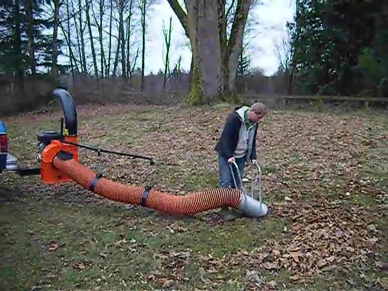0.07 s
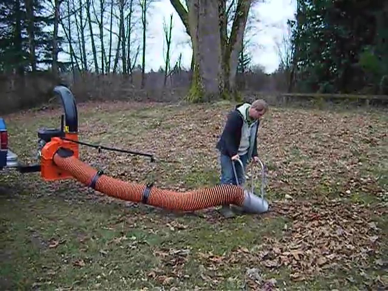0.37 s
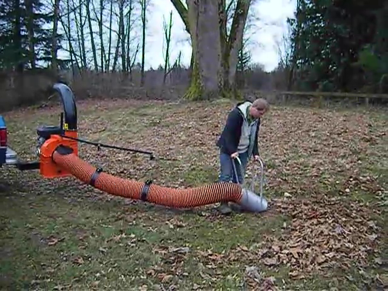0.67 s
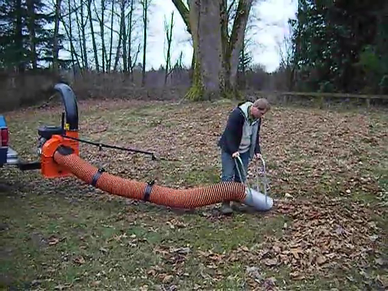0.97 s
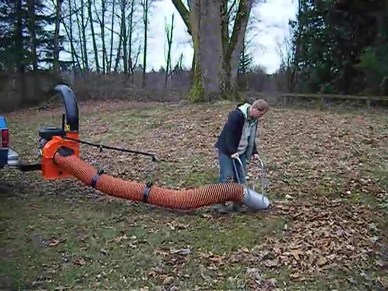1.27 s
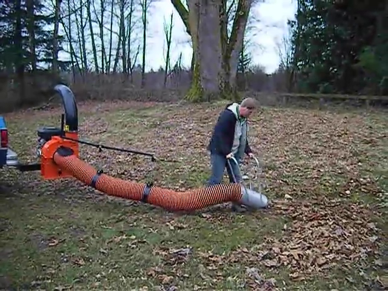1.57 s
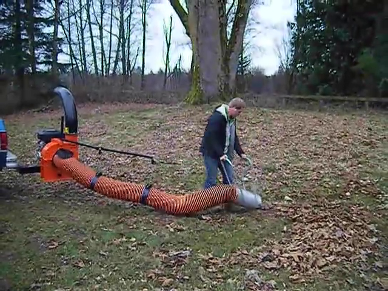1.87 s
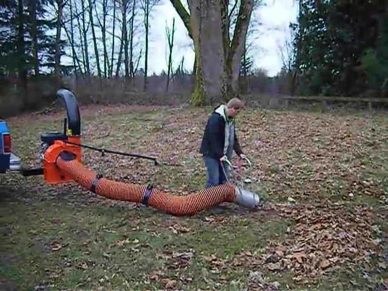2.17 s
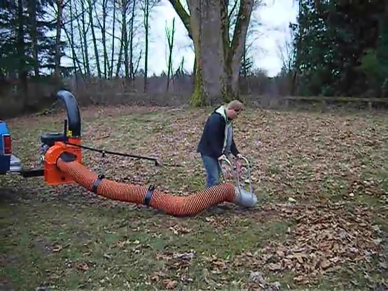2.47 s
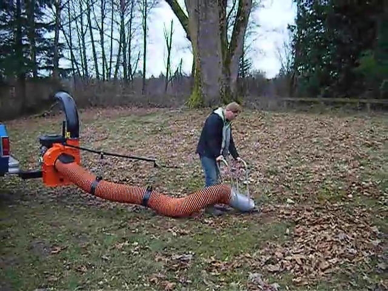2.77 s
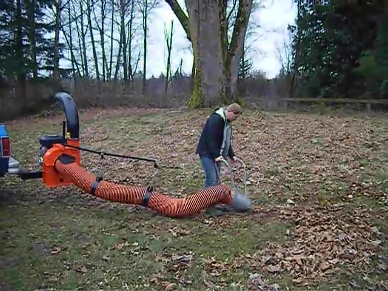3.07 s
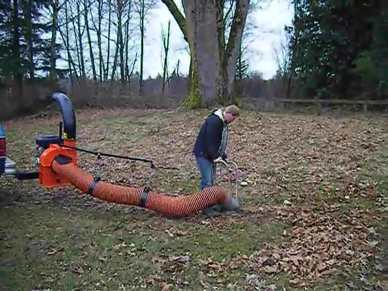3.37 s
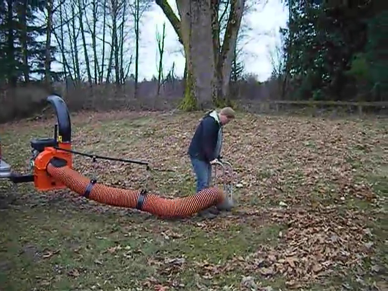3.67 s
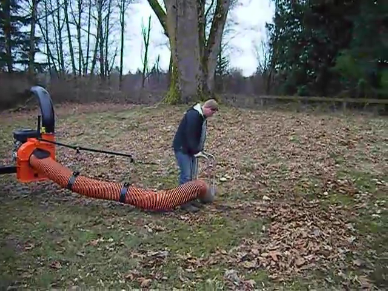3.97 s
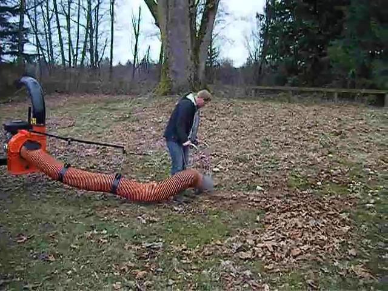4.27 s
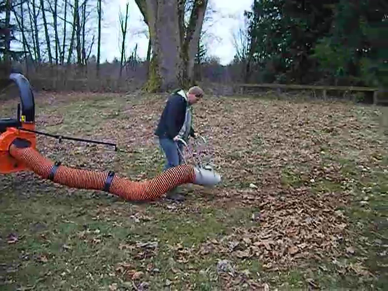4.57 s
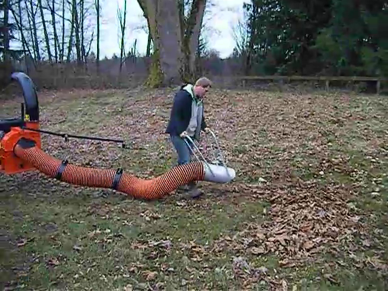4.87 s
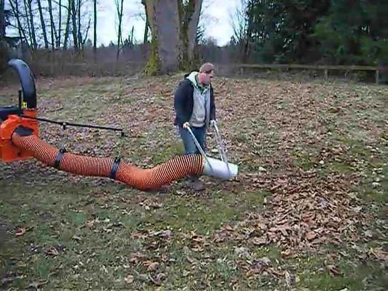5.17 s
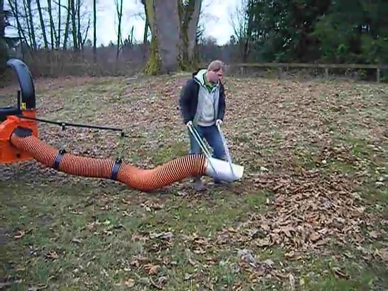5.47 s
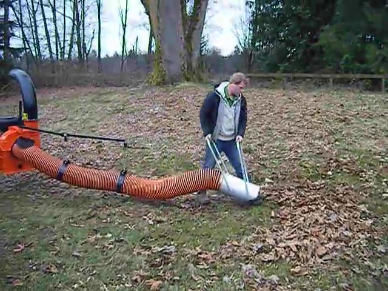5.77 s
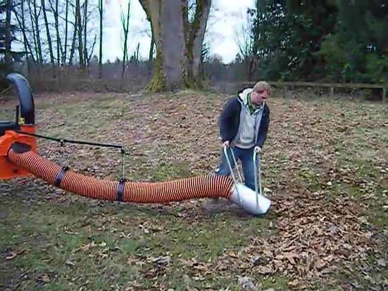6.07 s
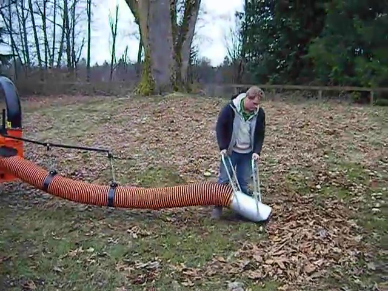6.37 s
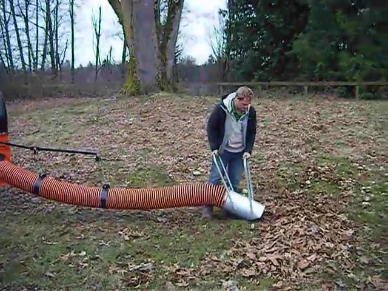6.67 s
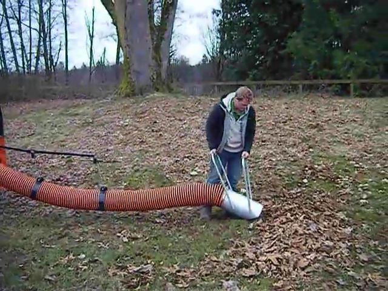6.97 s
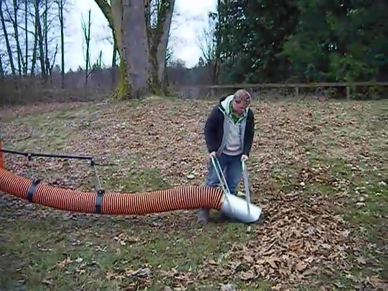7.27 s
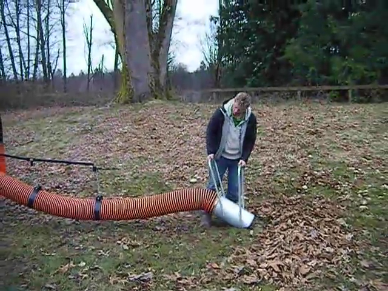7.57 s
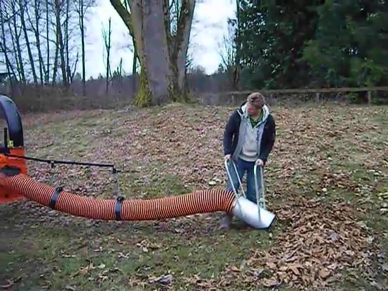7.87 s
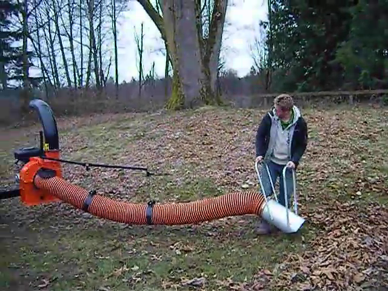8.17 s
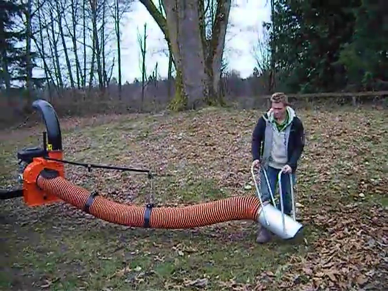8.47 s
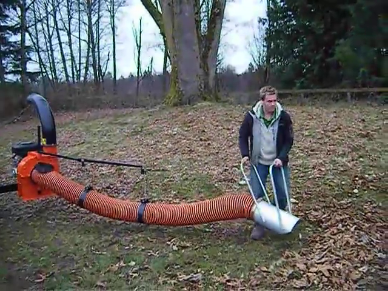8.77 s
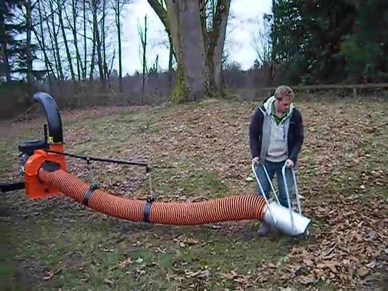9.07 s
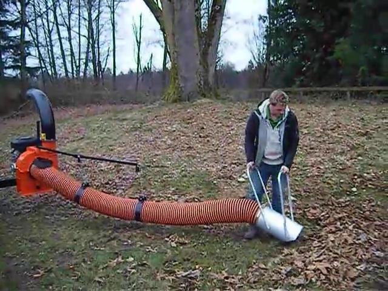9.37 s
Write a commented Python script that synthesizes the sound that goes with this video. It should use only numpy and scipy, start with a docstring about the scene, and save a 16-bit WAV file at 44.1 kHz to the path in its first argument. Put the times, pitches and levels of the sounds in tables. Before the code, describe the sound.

A loud engine and blower hum runs without a break outdoors as a leaf vacuum clears a lawn. Leaves hiss through the hollow hose in swells, with occasional twig snaps. About three quarters through, hard bits clatter and ring in the metal housing, and the drone dips for a moment. The microphone, dull in the treble, moves about and faces the machine at the end, so the air roar swells.

```python
"""On a lawn, a moving microphone hears a petrol debris loader running flat out: a V-twin engine spins
a four-bladed impeller that drones and roars. Gulps of leaves rustle up the hose in the first second
and again around 4 s, with twigs ticking among them. Just after 7 s a few hard pieces clang through
the steel housing and make the recorder's gain control duck. In the last second the microphone turns
back to the machine and the rush of air grows."""
import sys
import numpy as np
from scipy import signal
from scipy.fft import rfft, irfft, next_fast_len
from scipy.io import wavfile

SR = 44100
rng = np.random.default_rng(int(sys.argv[2]) if len(sys.argv) > 2 else 0)


def int16_out(signal):
    """Quantize to a 16-bit WAV file."""
    q = np.round(np.clip(np.atleast_2d(signal).T, -1, 1) * 32767)
    wavfile.write(sys.argv[1], SR, q.astype(np.int16))


N = 415422
TIME = np.arange(N) / SR
CUTOFF_HZ = 16000

# Levels in the tables are relative; each layer adds its own gain.
# rush of air at the microphone: time_s, level_db
AIR_LEVEL = [(0, -30.5), (2.6, -31.5), (5, -31), (8.2, -29), (9.1, -23), (9.42, -22)]
# engine note, in multiples of the four-stroke cycle: order, level_db
ENGINE_ORDERS = [(2, -18), (3, -20), (4, -17.5), (5, -8.5), (6, -17), (7, -16.5), (10, -20.5), (11, -17.5),
                 (22, -17.5)]
# turbulence in housing and chute: frequency_hz, density_db
ROAR_SPECTRUM = [(35, -26), (75, -23.5), (125, -2.5), (190, -8.5), (270, -4), (350, 0.5), (410, -6.5),
                 (510, 4), (660, -5.5), (780, -2), (1030, -11), (1330, -8.5), (2300, -12.5), (5500, -23)]
# gulps of leaves: fullest_s, length_s, rustle_db, roar_db, choke_db
LEAF_GULPS = [(0.207, 0.4, 1, 1, 0.8), (0.5, 0.27, 1.6, -0.5, -0.3), (0.73, 0.059, 3, 0.5, 1),
              (0.92, 0.1, 5, 1, 0.8), (3.577, 0.24, 4.5, -0.5, 4.5), (3.924, 0.19, 4.3, 0.8, 2.5),
              (4.26, 0.22, 4.5, 3, 2.5), (4.48, 0.18, 0.5, 1.5, -0.5), (5.648, 0.34, 1, 2.5, 0),
              (7.043, 0.27, 5, 1.5, 4.5), (7.508, 0.37, 3, -0.5, 2)]
# leaves sliding through: frequency_hz, density_db
RUSTLE_SPECTRUM = [(700, -17.5), (1300, 4.5), (1550, -5.5), (1850, 0.5), (2400, 0), (3600, -2), (5000, 1.5),
                   (5500, 0), (6000, -15.5)]
# hollow resonances of the duct: pitch_hz, width_hz, level_db
DUCT_MODES = [(1270, 60, -3), (1380, 60, 0), (1830, 120, -7), (2865, 55, 1), (3320, 25, -6), (3560, 22, 6),
              (3607, 18, 0), (4130, 30, -5)]
# twigs in the hose: start_s, level_db
TWIG_SNAPS = [(0.701, -17), (3.732, -13.5), (3.827, -14), (4.028, -17), (4.8513, -14.5), (7.053, -13),
              (8.6582, -26), (9.267, -16)]
# clatter of fragments: frequency_hz, density_db
CLATTER_SPECTRUM = [(400, -21), (1000, -9.5), (1500, -4), (1900, -4), (2400, -5), (3000, -1.5),
                    (4000, -0.5), (5000, 0), (6000, -4.5)]
# hard pieces hitting the housing: start_s, level_db, clatter_t60_s, ring_db, favoured_hz
HARD_HITS = [(7.113, -10, 0.094, -26, 4800), (7.117, -7.5, 0.1, 3.5, 3640), (7.137, -2, 0.25, 4.5, 1970),
             (7.149, 1.5, 0.19, -15, 3830), (7.164, -4, 0.096, 7.5, 4010),
             (7.251, -10.5, 0.24, -25.5, 4000), (7.367, -13, 0.17, -2, 2240), (7.374, -7, 0.28, -8.5, 4625),
             (7.396, -10.5, 0.27, 3.5, 2480), (7.724, -20, 0.49, -26, 4730), (7.750, 1, .035, 2.5, 2190),
             (7.757, 2.5, 0.024, -16, 4800)]
# modes of the steel housing: pitch_hz, level_db, t60_s
HOUSING_MODES = [(1486, -10, .6), (1697, -8, .6), (1873, -.5, .5), (1925, -4, .5), (1981, -1, .5),
                 (2168, -6, .65), (2400, -6, .45), (2482, -4, .5), (2695, -7, .6), (2783, -7, .55),
                 (2935, -5, .35), (3080, -4, .45), (3190, -5, .4), (3300, -5, .4), (3642, -4, .45),
                 (3715, -5, .4), (3832, -2, .4), (4001, -3, .45), (4130, -4, .4), (4445, -5, .4),
                 (4625, -4, .5), (4802, 2, .45), (4865, -3, .35), (5065, -4, .35)]
# blade-pass rate at governed speed: time_s, pitch_hz
BLADE_RATE = [(0, 231.3), (1, 232.3), (2, 230.7), (2.5, 230.8), (3.75, 232.3), (4.1, 231.5), (5.1, 232.0),
              (5.7, 232.0), (6.85, 230.4), (7.2, 227.0), (7.65, 229.8), (7.85, 229.1), (8.7, 231.6),
              (9.2, 229.6), (9.42, 229.5)]
# blade harmonics at the moving microphone: time_s, first_db, second_db, third_db, fourth_db
DRONE_LEVELS = [(0, -14, -30.5, -38, -48), (0.7, -14, -30.5, -52, -45.5), (1.4, -13.5, -29.5, -41.5, -42),
                (2.4, -13.5, -30.5, -37.5, -46.5), (4.75, -13.5, -30, -43.5, -41.5),
                (5.25, -13.5, -34.5, -40, -42), (5.7, -15.3, -25, -38.5, -40.2),
                (6.05, -13, -30, -38, -41.0), (7.8, -14, -33, -49, -44), (8.5, -16.5, -28, -31.5, -40),
                (8.85, -23.5, -25.8, -40.5, -34.5), (9.42, -19.1, -23.5, -34, -34)]
# weak upper blade harmonics, following the fourth: harmonic, level_db
BLADE_OVERTONES = [(5, -8.5), (6, -16), (7, -8), (9, -21.5)]
# loss in each blade harmonic, in dB per dB of choking: first, second, third, fourth
CHOKE_WEIGHTS = [0.73, .8, 8.8, 0.65]


def from_db(db):
    """Decibels to gain."""
    return 10 ** (np.asarray(db) / 20)


def unit_rms(x):
    """Scale to unit rms."""
    return x / np.sqrt(np.mean(x ** 2) + 1e-20)


def curves(rows):
    """One curve per value column of a table that starts with time_s."""
    times, *columns = np.transpose(rows)
    return [np.interp(TIME, times, column) for column in columns]


def drift(rate_hz):
    """Slow random wander with rms 1."""
    step, settle = 40, 2000
    pole = np.exp(-2 * np.pi * rate_hz * step / SR)
    noise = rng.standard_normal(N // step + settle + 2)
    slow = signal.lfilter([1], [1, -2 * pole, pole * pole], noise)[settle:]
    return np.interp(np.arange(N) / step, np.arange(len(slow)), unit_rms(slow))


def colour(x, spectrum):
    """Give a flat sound a spectrum; rms 1."""
    hz, db = np.transpose(spectrum)
    size = next_fast_len(N)
    bins = np.maximum(np.fft.rfftfreq(size, 1 / SR), 1)
    gain = from_db(np.interp(np.log(bins), np.log(hz), db)) * (bins < CUTOFF_HZ + 500)
    return unit_rms(irfft(rfft(x, size) * gain, size)[:N])


def resonate(x, hz, width_hz):
    """A resonance with gain 1 at its peak."""
    r, w = np.exp(-np.pi * width_hz / SR), 2 * np.pi * hz / SR
    return signal.lfilter(np.array([1, 0, -1]) * (1 - r * r) / 2, [1, -2 * r * np.cos(w), r * r], x)


def ring(clicks, hz, t60_s):
    """A unit click sets a sine of height 1 ringing."""
    r, w = from_db(-60 / (t60_s * SR)), 2 * np.pi * hz / SR
    return signal.lfilter([0, np.sin(w)], [1, -2 * r * np.cos(w), r * r], clicks + 1e-18)


def bursts(rows):
    """Joint envelope of sudden bursts: start_s, level_db, t60_s."""
    power = np.zeros(N)
    for start_s, db, t60_s in rows:
        start = int(start_s * SR)
        age = TIME[:min(N - start, int(t60_s * SR))]
        power[start:start + len(age)] += from_db(db - 60 * age / t60_s) ** 2
    return np.sqrt(power)


def grains(per_s, spread_db):
    """Random tiny impacts of uneven size."""
    sizes = from_db(spread_db * np.minimum(rng.exponential(1, N), 4))
    return unit_rms(sizes * rng.choice([-1, 1], N) * (rng.random(N) < per_s / SR))


def engine(cycle, rough_db=0.3):
    """Low exhaust orders behind the drone, each a little uneven from firing to firing."""
    note = np.zeros(N)
    for order, db in ENGINE_ORDERS:
        level = from_db(db + rough_db * drift(23))
        note += level * np.sin(2 * np.pi * (order * cycle + rng.random()))
    return np.sqrt(2) * note


def exhaust_puffs(cycle, fade_cycles=0.15):
    """Two cylinders fire three eighths of a cycle apart; each puff fades quickly."""
    ages = [cycle % 1, (cycle - 3 / 8) % 1]
    return sum(np.exp(-age / fade_cycles) for age in ages)


def air_roar(blade, puffs, chop=0.19, throb=0.12):
    """Turbulent air, chopped by the blades and swelling with each exhaust puff."""
    chopped = rng.standard_normal(N) * (1 + chop * np.cos(2 * np.pi * blade))
    return colour(chopped * (1 + throb * puffs), ROAR_SPECTRUM) * from_db(0.88 * drift(26))


def leaf_gulps(hose_stretch=1.7):
    """Each gulp swells and fades as a bell curve: it chokes the inlet and sounds longer in the hose."""
    leaves_db, load_db, choke_db = np.zeros((3, N))
    for fullest_s, length_s, rustling, roaring, choking in LEAF_GULPS:
        at_inlet = 2 ** -(2 * (TIME - fullest_s) / length_s) ** 2
        in_hose = at_inlet ** (1 / hose_stretch ** 2)
        leaves_db += rustling * in_hose
        load_db += roaring * in_hose
        choke_db += choking * at_inlet
    return leaves_db, load_db, choke_db


def leaf_rustle(puffs, throb=1.2, scraps_db=-5, clump_db=1.0):
    """Hiss and leaf scraps peppering the hollow duct, pulsing with the engine."""
    scraps = from_db(scraps_db + 2.3 * drift(28)) * grains(per_s=2500, spread_db=4.0)
    leaves = (rng.standard_normal(N) + scraps) * (1 + throb * puffs)
    duct = sum(from_db(db) * resonate(leaves, hz, width_hz) for hz, width_hz, db in DUCT_MODES)
    return colour(leaves + duct, RUSTLE_SPECTRUM) * from_db(clump_db * drift(5.2))


def twigs(level_db=-4, t60_s=0.045):
    """Twigs tick in the hose as short, dry snaps."""
    snaps = bursts((start_s, db, t60_s) for start_s, db in TWIG_SNAPS)
    return from_db(level_db) * colour(rng.standard_normal(N), CLATTER_SPECTRUM) * snaps


def housing_knocks(modes_db=-21, wash_db=-13, wash_t60_s=0.62, clank_db=-16, clank_t60_s=0.014):
    """A hard piece clatters and clanks, the housing's clear modes ring, and its dense ones wash away."""
    start_s, level_db, clatter_t60_s, ring_db, favoured_hz = np.transpose(HARD_HITS)
    struck_db = level_db + ring_db
    clatter = bursts(zip(start_s, level_db, clatter_t60_s))
    wash = bursts((s, db + wash_db, wash_t60_s) for s, db in zip(start_s, struck_db))
    out = colour(rng.standard_normal(N), CLATTER_SPECTRUM) * np.hypot(clatter, wash)
    for hz, mode_db, t60_s in HOUSING_MODES:
        favour_db = 7 * np.exp(-((hz - favoured_hz) / 60) ** 2)   # the struck spot favours some modes
        # bending waves reach the panels at different moments
        arrival_s = start_s + rng.uniform(0, 0.0019, len(start_s))
        click_db = struck_db + mode_db + favour_db + rng.normal(0, 1, len(start_s))
        clicks = np.zeros(N)
        clicks[(arrival_s * SR).astype(int)] = from_db(click_db)
        out += from_db(modes_db) * ring(clicks, hz, t60_s)
        out += from_db(clank_db) * ring(clicks, hz, clank_t60_s)
    return out


def impeller(blade, choke_db, flutter_db=0.41, flutter_db_per_harmonic=0.22):
    """Blades passing the outlet give a nearly pure drone; gusty air shakes higher overtones more."""
    levels_db = [db - weight * choke_db for db, weight in zip(curves(DRONE_LEVELS), CHOKE_WEIGHTS)]
    first, second, third, fourth = levels_db
    drone = from_db(first + 0.26 + flutter_db * drift(11)) * np.sin(2 * np.pi * blade)
    overtones = [(2, second + 1.5), (3, third + 2), (4, fourth + 2)]
    overtones += [(harmonic, fourth + 3 + db) for harmonic, db in BLADE_OVERTONES]
    for harmonic, db in overtones:
        phase = harmonic * blade + rng.random() + harmonic * 0.01 * drift(12)
        level = from_db(db + harmonic * flutter_db_per_harmonic * drift(3.4))
        drone += level * np.sin(2 * np.pi * phase)
    return np.sqrt(2) * drone


def scene():
    """The loader at one microphone; engine and impeller share a shaft, eight blade passes to a cycle."""
    blade_hz = curves(BLADE_RATE)[0] * (1 + 0.00059 * drift(7.3))
    blade = np.cumsum(blade_hz) / SR   # blade passes so far
    cycle = blade / 8
    puffs = exhaust_puffs(cycle)
    air_db, = curves(AIR_LEVEL)
    leaves_db, load_db, choke_db = leaf_gulps()
    mix = impeller(blade, choke_db)
    mix += from_db(air_db + load_db - 5) * engine(cycle)
    mix += from_db(air_db + load_db + 0.5) * air_roar(blade, puffs)
    mix += from_db(air_db + leaves_db - 5.5) * leaf_rustle(puffs)
    mix += twigs() + housing_knocks()
    return mix[None]


def gain_control(x, ceiling=0.98, treble_weight=0.77, recovery_per_s=3.74, attack_s=0.006):
    """Peaks, above all sharp ones, pull the gain down fast; it climbs back along a straight ramp."""
    sensed = np.abs(x + treble_weight * np.diff(x, prepend=0))
    allowed = ceiling / np.maximum(sensed, ceiling)
    ramp = recovery_per_s * TIME
    gain = np.minimum.accumulate(allowed - ramp, axis=-1) + ramp
    pole = np.exp(-1 / (attack_s * SR))
    duck = signal.lfilter([1 - pole], [1, -pole], 1 - gain)
    return x * (1 - duck)


def record(dry, low_cut_hz=100, high_cut_hz=5380, band_edge_hz=6030):
    """A narrow-band recorder with gain control and a bass cut."""
    x = np.clip(gain_control(dry), -0.75, 0.75)
    x = signal.sosfilt(signal.butter(2, low_cut_hz, "high", fs=SR, output="sos"), x)
    x = signal.sosfilt(signal.butter(10, high_cut_hz, fs=SR, output="sos"), x)
    band_edge = signal.firwin(201, band_edge_hz, fs=SR, window="blackman")
    x = signal.fftconvolve(x, band_edge[None], mode="same")
    x = np.clip(x, -0.71, 0.71)   # the hardest peaks overload the output and spit
    return signal.sosfilt(signal.cheby2(12, 70, CUTOFF_HZ, fs=SR, output="sos"), x)


dry = scene()
out = record(dry)
int16_out(out)
```